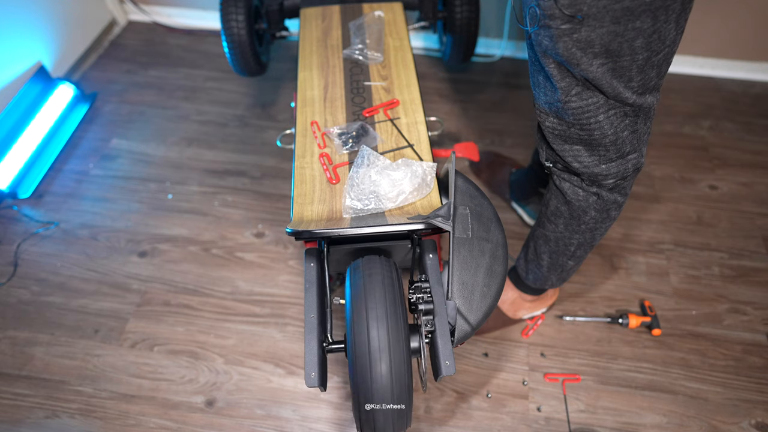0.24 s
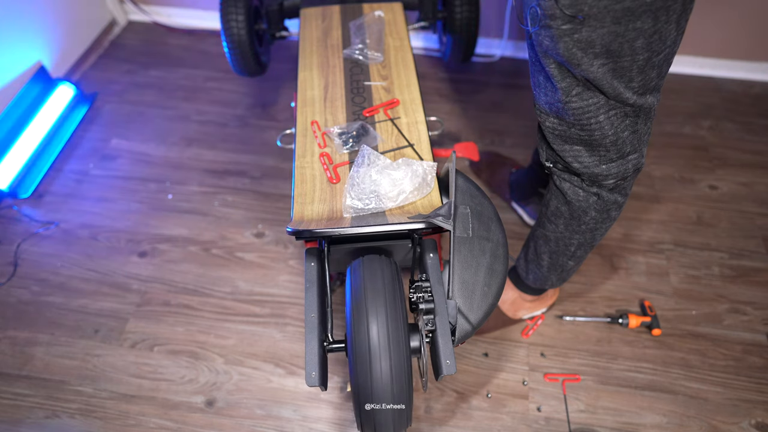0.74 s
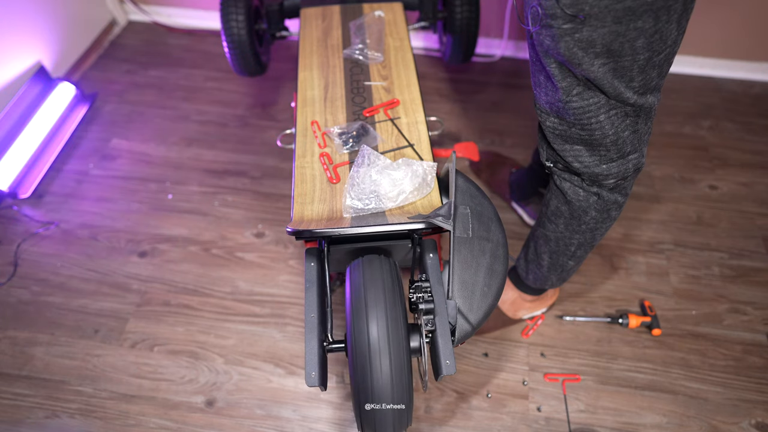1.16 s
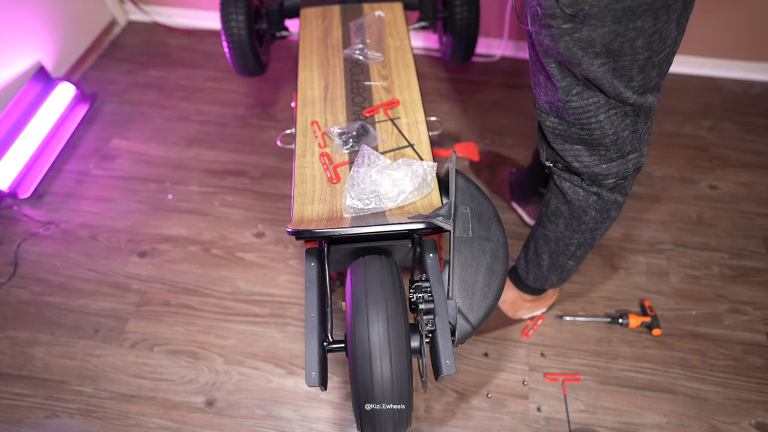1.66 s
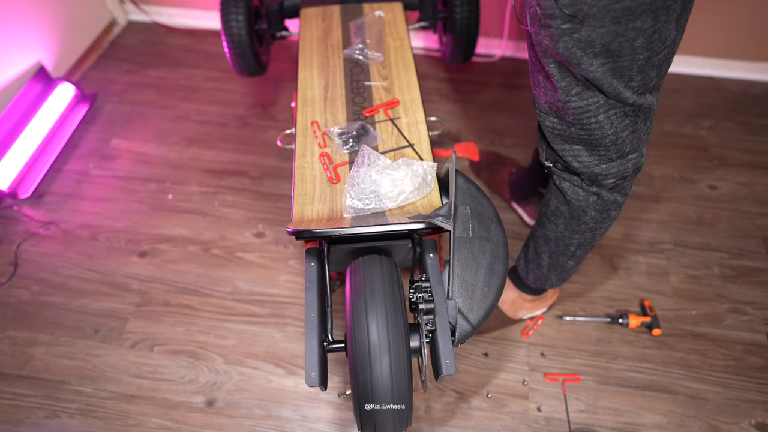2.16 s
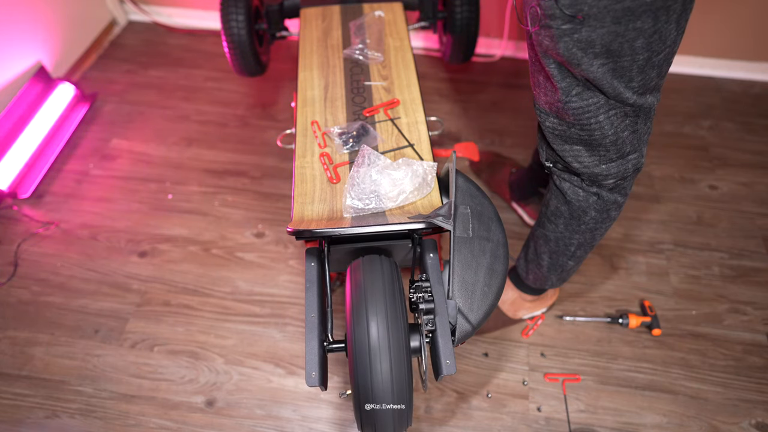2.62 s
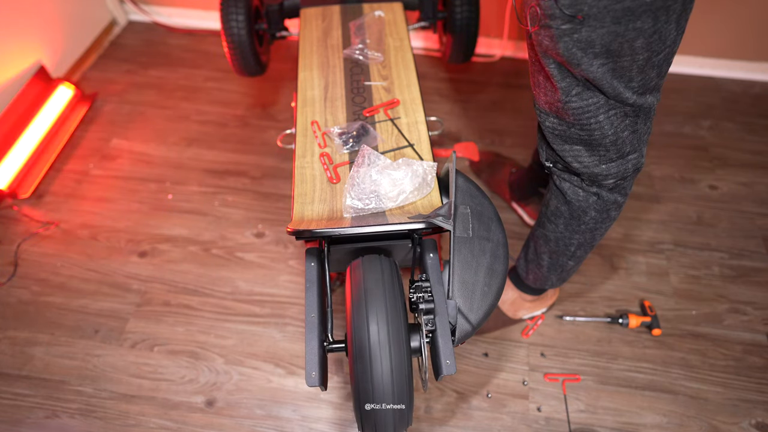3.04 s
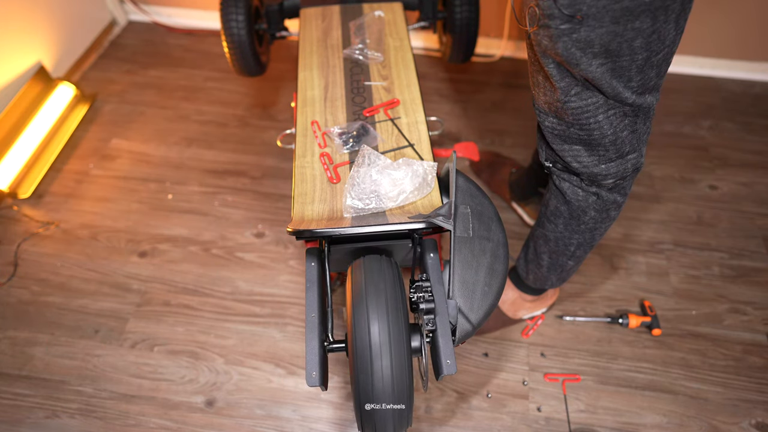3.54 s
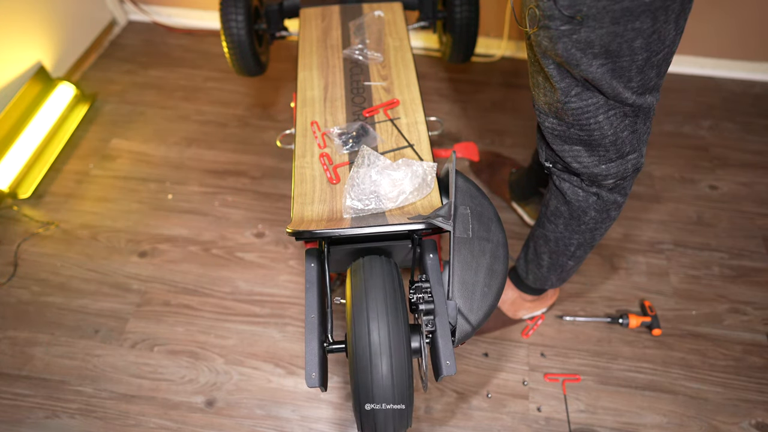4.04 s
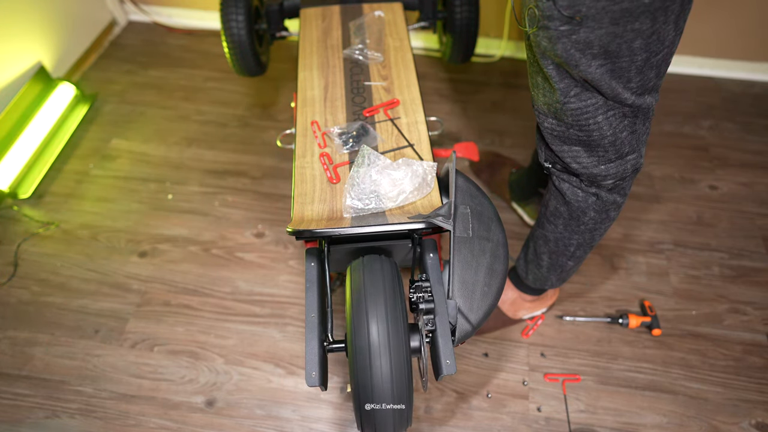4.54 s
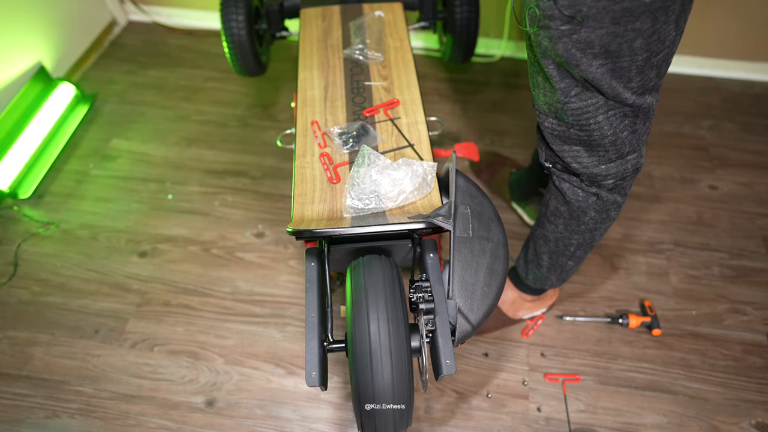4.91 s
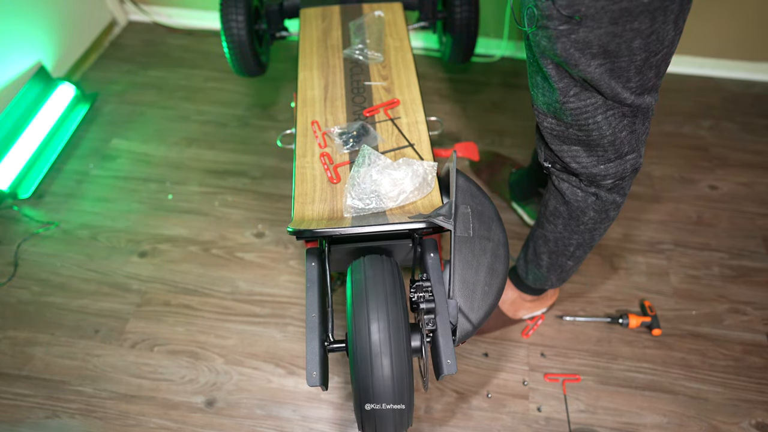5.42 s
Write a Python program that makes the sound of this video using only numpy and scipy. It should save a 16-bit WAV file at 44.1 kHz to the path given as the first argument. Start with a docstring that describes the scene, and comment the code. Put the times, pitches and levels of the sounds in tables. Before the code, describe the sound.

A scooter's motor wheel whines and hums steadily indoors, interrupted by hard brake clacks and hisses, slowing and surging back up each time.

```python
"""A scooter's hub-motor wheel spins free of the floor and shakes the deck, whose modes hum.
Its magnets and controller whine as tones tied to the turn; the disc brushes its pads once a turn.
Three brake grips, the first already under way, slow the wheel to a crawl: clacks are struck modes,
pads hiss as coloured noise and ring the disc. Twice the motor drives the wheel up again.
Low noise of a small room lies behind."""
import sys
import numpy as np
from scipy import signal
from scipy.fft import rfft, irfft
from scipy.io import wavfile
from scipy.ndimage import uniform_filter1d, minimum_filter1d

SR = 44100
rng = np.random.default_rng(int(sys.argv[2]) if len(sys.argv) > 2 else 0)


def wav_record(signal):
    """Record a signal, one row per channel, as 16-bit PCM in the file named by sys.argv[1]."""
    frames = np.transpose(np.atleast_2d(signal))
    bounded = np.clip(frames, -1, 1)
    # unit amplitude maps onto the largest positive 16-bit level
    quanta = np.round(bounded * 32767).astype(np.int16)
    wavfile.write(sys.argv[1], SR, quanta)


N = 250488
T = np.arange(N) / SR
BINS = np.maximum(np.arange(N // 2 + 1) * SR / N, 1.)  # Hz

# Brake stops. Each row: throttle off, pads grip and drive back on, all in seconds.
STOPS = [(-.09, -.08, .134), (3.58, 3.703, 3.932), (5.42, 5.447, 9)]
FULL_TPS, CRAWL_TPS = 14.88, 1  # turns per s
COAST, BRAKING, DRIVE = 22, 50, 82  # turns per s2: coasting loss, added brake loss, motor's gain
DRIVE_FADE_S = .08

# Level of the deck's hum. Each row: time in seconds, level in dB.
HUM_LEVEL = [(0.0, -17), (0.14, -22), (0.24, -11.5), (1.64, -16), (1.66, -11), (1.99, -19.5), (2.01, -11.5),
             (3.13, -15), (3.23, -9), (3.62, -14.5), (3.67, -19), (3.99, -26.5), (4.05, -11.5),
             (4.24, -12.5), (4.48, -20), (4.54, -7.5), (4.67, -21), (4.7, -14), (5.41, -11.5),
             (5.46, -23.5), (5.51, -7.5), (5.68, -35.5)]
# Deck modes. Each row: frequency in Hz, nominal width in Hz, relative level in dB.
DECK_MODES = [(217.7, 10, -22), (253.1, 1.3, -4), (285.4, 14.6, 0), (307.1, 4.4, -4), (320.6, 6.5, -10),
              (334, 9.1, -9)]
# Deck tones locked to the turn. Each entry: cycles per turn.
DECK_ORDERS = [17, 19, 20, 21, 22]
# Share of each deck tone in the hum. Each entry: relative level in dB.
DECK_ORDER_DB = [-18.5, 0, -7.5, -11, -18.5]
TONE_SHARE_DB = -0.5  # turn-locked tones against the random hum
JOLT_TURN = .3  # place in the turn where the deck tones add up (0-1)
HOLD_S, HOLD = 0.062, 0.51  # evening out of the hum's swing: averaging time, share (0-1)
SURGE_TPS, SURGE_WIDTH_TPS, SURGE_DB = 11.7, 2, 2  # hum surges as the driven wheel passes this speed
WAVER_DB, WAVER_HZ = 0.5, 5.097  # chance wavering of the hum: nominal depth, rate

# Wheel tones locked to the turn, magnets every 15th. Each entry: cycles per turn.
WHEEL_ORDERS = [15, 27, 28, 30, 36, 39, 42, 45, 50, 53, 60, 67, 75, 97, 109, 120, 133, 149, 166, 270, 298,
                300, 353, 422, 455, 490, 508, 590]
# Balance of each wheel tone. Each row: level at full speed in dB, left minus right in dB.
WHEEL_TONES = [(-36, -4), (-50, -3), (-41, -3), (-36, -3), (-47, -3), (-47, -3), (-52, -6), (-43.5, -8),
               (-54, -3), (-56, -6), (-47.5, -3), (-54, -1), (-51, 0), (-53, -2), (-50, 3), (-57, 0),
               (-60, 0), (-67, 0), (-65, 0), (-66, 0), (-67, 0), (-65, 0), (-76, 0), (-77, 0), (-74, 0),
               (-76, 0), (-76, 0), (-76, 0)]
# Torque ripple of the driven motor. Each entry: cycles per turn.
TORQUE_ORDERS = [30, 45, 90]
# Level of each torque ripple ahead of the frame's flare. Each entry: dB.
TORQUE_DB = [-40, -46.5, -49.5]
# Frame resonances. Each row: frequency in Hz, nominal width in Hz, lift in dB.
FRAME = [(443, 14, 9.5), (560.4, 22.4, 9), (737, 43, 4.5), (876, 42, 8), (976, 34, 7), (1130, 44, 1.5),
         (1423, 6.7, 15), (1870, 59, 8), (4430, 41, -3)]

SWITCH_HZ = 15968.4  # controller switching, heard through its motor sidebands
# Sidebands below the switching frequency. Each entry: cycles per turn below it.
SIDEBAND_ORDERS = [15, 22, 39, 45, 47, 69, 73, 75, 105, 114, 120]
# Balance of each sideband. Each row: level in dB, left minus right in dB.
SIDEBANDS = [(-75, -4), (-76, -4), (-73, 0), (-59, 6), (-76, -8), (-75, 1), (-74, -12), (-66, 4), (-70, -2),
             (-74, -8), (-72, -9)]
# Spectrum of the coils' sizzle. Each row: frequency in Hz, relative level in dB per Hz.
COIL_COLOUR = [(2650, -11), (4500, -10.5), (4990, -27.5), (7420, -0.5), (7980, -3), (8460, 1.5),
               (9290, -3.5), (10500, 2), (13300, -8), (14800, -2.5), (15600, -6)]
COIL_DB = -51.5  # ahead of the drive's weighting

# Spectrum of the whirr ahead of the frame. Each row: frequency in Hz, relative level in dB per Hz.
WHIRR_COLOUR = [(340, -34), (370, -9.5), (400, -6), (500, -7.5), (660, -8), (810, -16.5), (1250, -16.5),
                (1640, -17.5), (2100, -21), (2400, -23), (3300, -26), (4300, -29.5), (6000, -31.5),
                (7800, -42.5)]
# Gains shared by whirr and rub, each of which has its own trim in whirr()
WHIRR_STILL_DB, WHIRR_FULL_DB = -48, -38.5  # at rest and at full speed
GRIND_DB = 2  # extra grind at full speed and full push
DRAG_DB, RATTLE_S = -15.5, 0.015  # gain from the bite against the hiss; rise time of a rattle

# The pads' bite in each stop. Each row: hardest moment in seconds, hiss in dB, disc ring in dB,
# onset length in seconds.
BITES = [(-.025, -26.5, -28.5, .01), (3.741, -30.5, -29.5, 0.017), (5.504, -21.5, -27, 0.0051)]
HISS_COLUMN, RING_COLUMN = 1, 2
HISS_FALL, RING_FALL = 1360, 1870  # either side of the hardest bite (dB per s2)
RING_LATE_S = 0.018  # the disc's ring peaks behind the hiss
# Spectrum of the pads' hiss. Each row: frequency in Hz, relative level in dB per Hz.
PAD_COLOUR = [(710, -42), (1200, -42), (2490, -4), (2710, -13), (2850, -13), (3420, -4), (4130, -5.5),
              (6580, -2), (7630, 3.5), (8480, 6.5), (11000, 4.5), (13800, -11.5), (15000, -52)]
TOP_SLOW_DB, TOP_FROM_HZ = -16, 11400  # the hiss dulls as the wheel slows: change from full speed to rest
# Caliper and disc modes. Each row: frequency in Hz, relative level in dB, 60 dB decay time in seconds.
CALIPER = [(440, -9, .15), (580, -4, .25), (750, -11, .1), (1010, 4, .17), (1070, -1, .13), (1350, -7, .1),
           (1440, -10, .1), (1690, -7, .12), (1820, -9, .12), (2220, -8, .07), (3530, -14, .08),
           (4740, -16, .08), (6460, -16, .1), (7160, -13, .08), (7480, -10, .2), (7900, -8, .2),
           (9370, -12, .05), (10000, -14, .1), (10800, -14, .1), (11400, -14, .1)]
# Blows of lever, caliper and drive take-up. Each row: start in seconds, level in dB, tick against
# the blow in dB, low-pass corner of the blow in Hz, thud against the blow in dB, frame rattle
# against the blow in dB.
CLACKS = [(0.014, -23.5, -20, 3030, -9, -14), (0.096, -21.5, -0.5, 11100, -22, -20.5),
          (.24, -41.5, -17, 2500, -20, 0.5), (0.282, -30.5, -12, 5000, -20, -13.5),
          (3.654, -18.5, -17, 3500, -22.5, -16), (3.866, -31.5, 3, 11000, -22, -16.5),
          (3.954, -25, -21, 2500, -8, -23), (4.548, -32.5, -34, 4020, -28, -12.5),
          (5.422, -23.5, -12, 3000, -22, -8.5), (5.484, -17, -27.5, 2500, -15, -25),
          (5.599, -30.5, -14.5, 900, 6, -7.5)]
THUD_HZ, THUD_T60_S = 148, .28  # the stand under the deck
BLOW_S = .0055  # a padded blow builds up

# Spectrum of the room's noise. Each row: frequency in Hz, relative level in dB per Hz.
ROOM_COLOUR = [(11, -47.5), (18, -26), (38, -5.5), (70, -19.5), (97, -9.5), (118, -19), (146, -9.5),
               (162, -14.5), (179, -36.5), (200, -7), (260, -32.5), (440, -120)]
ROOM_DB = -41
# Microphone pair. Each row: frequency in Hz, likeness from 0 to 1, left lead in radians,
# left minus right in dB.
PAIR = [(20, .8, -2, -1.5), (60, .4, -1, -1), (125, .82, 0, -5.8), (280, .99, .05, -5.9),
        (500, .85, 0, -2.5), (1000, .76, -.12, -.5), (2300, .7, -.19, -1.5), (4200, .6, -.35, -1.5),
        (6000, .6, -1.2, -2.3), (7500, .75, -1.9, -2.3), (8700, .75, -2.7, -1.6), (10000, .7, -3.3, -1.8),
        (13000, .5, -4.3, -3.3), (15500, .3, -5.3, -4)]
CEILING, LIMITER_S, TOP_HZ = 1.05, .012, 15795  # limiter ceiling and window; treble cut


def undb(db):
    """Amplitude of a level in dB."""
    return 10 ** (np.asarray(db) / 20)


def shape(points):
    """Columns of a (Hz, value, ..) table, one value per frequency bin."""
    hz, *columns = np.transpose(points)
    return [np.interp(np.log(BINS), np.log(hz), c) for c in columns]


def colour(points):
    """Gain per bin of a spectrum, silent outside its ends."""
    return undb(shape(points)[0]) * (BINS > points[0][0]) * (BINS < points[-1][0])


def bell(hz, width):
    """Gain per bin of one resonance."""
    return 1 / np.sqrt(1 + ((BINS - hz ** 2 / BINS) / width) ** 2)


def pair(direct, diffuse):
    """Two microphone ports: the left hears a shifted phase and partly a second, diffuse sound."""
    like, lead, pan_db = shape(PAIR)
    left = like * direct * np.exp(1j * lead) + np.sqrt(1 - like ** 2) * diffuse
    return irfft(np.array([left * undb(pan_db / 2), direct * undb(-pan_db / 2)]), N)


def noise(gain):
    """Stereo noise of a given colour, rms 1 in the middle."""
    x = pair(*(gain * rfft(rng.standard_normal((2, N)))))
    return x / x.mean(axis=0).std()


def smooth_twice(x, size):
    """Two running means in a row."""
    return uniform_filter1d(uniform_filter1d(x, size), size)


def walk(rate):
    """Random levels held 1 / rate s and slewed twice."""
    k = int(SR / rate)
    return smooth_twice(np.repeat(rng.standard_normal(N // k + 1), k), k)[:N]


def tone(cycles, db, pan_db):
    """A sine whose level wanders a little, placed left or right."""
    wave = np.sqrt(2) * np.cos(2 * np.pi * cycles) * undb(db + 3.5 * walk(3.68))
    return wave * undb(np.array([[pan_db / 2], [-pan_db / 2]]))


def wheel():
    """Speed (turns per s) and drive (0-1): coast, brake to a crawl, gain speed again."""
    def since(s):
        return np.maximum(T - s, 0)

    speeds, idle = [], np.zeros(N)
    for off, grip, on in STOPS:
        slowing = FULL_TPS - COAST * since(off) - BRAKING * since(grip)
        gaining = CRAWL_TPS + DRIVE * since(on)
        speeds.append(np.clip(np.maximum(slowing, gaining), CRAWL_TPS, FULL_TPS))
        idle += (T > grip) * (T < on)
    speed = uniform_filter1d(np.min(speeds, axis=0), SR // 40, mode="nearest")
    drive = 1 - uniform_filter1d(idle, int(DRIVE_FADE_S * SR), mode="nearest")
    return speed, drive


def deck(turns, full):
    """Random shaking and turn-locked tones ring the steep-sided deck modes."""
    power = sum((undb(db) * bell(hz, width) ** 1.736) ** 2 for hz, width, db in DECK_MODES)
    hum = noise(np.sqrt(power))
    for k, db in zip(DECK_ORDERS, DECK_ORDER_DB):
        hum += tone(k * (turns - JOLT_TURN), db + TONE_SHARE_DB, -6.) * full ** 8
    # the swing stays nearer its slow level
    swing = np.sqrt(smooth_twice(hum.mean(axis=0) ** 2, int(HOLD_S * SR)))
    gaining = np.gradient(full) > 0
    surge_db = SURGE_DB * np.exp(-((full * FULL_TPS - SURGE_TPS) / SURGE_WIDTH_TPS) ** 2) * gaining
    level_db = np.interp(T, *np.transpose(HUM_LEVEL)) + surge_db + WAVER_DB * walk(WAVER_HZ)
    return hum / swing ** HOLD * undb(level_db)


def wheel_tones(turns, speed):
    """Turn-locked tones fade off full speed; torque ripple sweeps up while the wheel gains speed."""
    full = speed / speed.max()
    out = np.zeros((2, N))
    for k, (db, pan_db) in zip(WHEEL_ORDERS, WHEEL_TONES):
        out += tone(k * turns + rng.random(), db, pan_db) * full ** 25.0
    push = np.clip(np.gradient(uniform_filter1d(speed, SR // 30)) * SR / 80, 0, 1)
    for k, db in zip(TORQUE_ORDERS, TORQUE_DB):
        ripple_hz = k * speed
        # the ripple flares as it passes each frame resonance
        flare = 1 + sum(undb(lift) / (1 + ((ripple_hz - hz) / width) ** 2) for hz, width, lift in FRAME)
        # the small motor shell radiates little bass
        heard = np.clip(ripple_hz / 600, 0, 1) ** 2
        out += push * flare * heard * undb(4 * walk(50)) * tone(k * turns, db, -3)
    return out


def controller(turns, drive):
    """Sidebands rise towards the switching frequency as the wheel slows; coils sizzle more when driven."""
    lines = np.zeros((2, N))
    for k, (db, pan_db) in zip(SIDEBAND_ORDERS, SIDEBANDS):
        lines += tone(SWITCH_HZ * T - k * turns + rng.random(), db, pan_db)
    # the sizzle swells once a turn
    sizzle = noise(colour(COIL_COLOUR)) * undb(COIL_DB + 1.3 * np.cos(2 * np.pi * (turns - .05)))
    return drive * lines + (0.63 + 0.55 * drive) * sizzle


def whirr(turns, full):
    """Broad whirr through the frame, with a brush of the pads each turn; bites and clacks stir it."""
    resonance = 1 + sum((undb(db) - 1) * bell(hz, width) ** 2 for hz, width, db in FRAME)
    body = noise(colour(WHIRR_COLOUR) * resonance) * undb(5 + 0.44 * walk(10))
    brush = np.exp(2.2 * (np.cos(2 * np.pi * (turns - .7)) - 1)) * undb(2.4 * walk(9))
    rub = noise(bell(1550, 900) ** 2) * brush * undb(-1.5)
    push = np.clip(np.gradient(full) * SR * FULL_TPS / DRIVE, 0, 1)
    spin_db = WHIRR_STILL_DB + (WHIRR_FULL_DB - WHIRR_STILL_DB + GRIND_DB * push) * full
    drag = undb(DRAG_DB) * bite(HISS_COLUMN, HISS_FALL)
    rattle = np.zeros(N)
    for start, db, _, _, _, rattle_db in CLACKS:
        after = np.maximum(T - start, 0) / RATTLE_S
        rattle += undb(db + rattle_db) * after * np.exp(1 - after)
    return (body + rub) * (undb(spin_db) + drag + rattle)


def bite(column, fall, late=0.):
    """Level of pad noise: sets in at the grip and falls away either side of the hardest bite."""
    level = np.zeros(N)
    for (_, grip, _), row in zip(STOPS, BITES):
        hardest, onset = row[0] + late, row[3]
        level += np.clip((T - grip) / onset, 0, 1) * undb(row[column] - fall * (T - hardest) ** 2)
    return level


def brake(full):
    """Pads hiss on the disc and keep the caliper and disc modes ringing."""
    # a shorter decay means a wider mode
    modes = [(hz, undb(db) * bell(hz, np.log(1000) / np.pi / t60 * 1.4)) for hz, db, t60 in CALIPER]
    low_modes = np.sqrt(sum(m ** 4 for hz, m in modes if hz < 3000)) ** .5
    high_modes = sum(m for hz, m in modes if hz > 3000)
    ring = noise(low_modes + 0.02 * bell(1800, 2500))
    hiss = noise(colour(PAD_COLOUR) * (1 + 4.4 * high_modes))
    dull = signal.filtfilt(*signal.butter(2, TOP_FROM_HZ, fs=SR), hiss)
    top = (hiss - dull) * undb(3 + TOP_SLOW_DB * (1 - full))
    hissing = (dull + top) * bite(HISS_COLUMN, HISS_FALL)
    return hissing + ring * bite(RING_COLUMN, RING_FALL, RING_LATE_S)


def clacks():
    """Each clack: the caliper modes, freshly weighted, a short gritty tick and a thud."""
    out, t = np.zeros(N), T[:SR // 4]
    for start, db, tick_db, corner_hz, thud_db, _ in CLACKS:
        ring = np.zeros(len(t))
        for hz, mode_db, t60 in CALIPER:
            weight, detune = rng.standard_normal(2)
            gain = undb(mode_db + 1.2 * weight - 0.00037 * hz)  # higher modes are struck less
            wave = np.sin(2 * np.pi * hz * (1 + 0.0087 * detune) * t)
            ring += gain * wave * np.exp(-np.log(1000) * t / t60)
        tick = rng.standard_normal(len(t)) * np.exp(-t / .011) * undb(tick_db)
        thud = undb(thud_db) * np.sin(2 * np.pi * THUD_HZ * t) * np.exp(-np.log(1000) * t / THUD_T60_S)
        hit = (ring / 2 + tick + thud) * (1 - np.exp(-t / BLOW_S)) * undb(db)
        i = int(start * SR)
        out[i:i + len(t)] += signal.lfilter(*signal.butter(2, corner_hz, fs=SR), hit)[:N - i]
    # a copy 180 samples late serves as the diffuse sound
    return pair(rfft(out), rfft(np.roll(out, 180)))


def room():
    """Steady low noise of the room, shaped by its peaks and dips."""
    return noise(colour(ROOM_COLOUR)) * undb(ROOM_DB)


def scene():
    """One wheel motion steers the deck, motor and whirr; brake, clacks and room join in."""
    speed, drive = wheel()
    turns, full = np.cumsum(speed) / SR, speed / FULL_TPS
    motor = wheel_tones(turns, speed) + controller(turns, drive)
    return deck(turns, full) + motor + whirr(turns, full) + brake(full) + clacks() + room()


def record(dry):
    """A look-ahead limiter holds the loudest swells, whose tips still clip; the top is cut."""
    size = int(LIMITER_S * SR)
    need = np.minimum(1, CEILING / (np.abs(dry).max(axis=0) + 1e-9))
    gain = uniform_filter1d(minimum_filter1d(need, size), size)
    top_cut = signal.ellip(16, .5, 60, TOP_HZ, fs=SR, output="sos")
    return signal.sosfilt(top_cut, np.clip(dry * gain, -1, 1))


dry = scene()
out = record(dry)
wav_record(out)
```